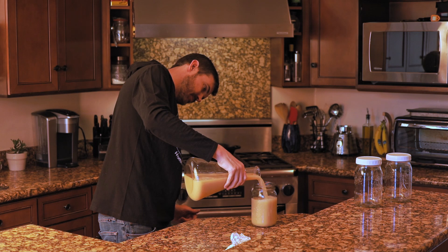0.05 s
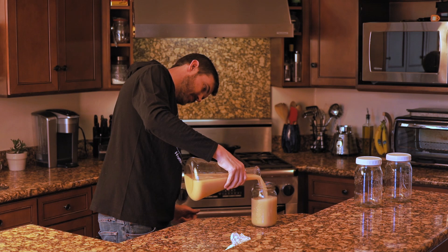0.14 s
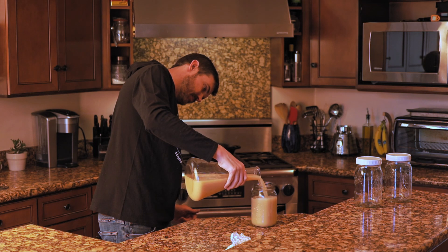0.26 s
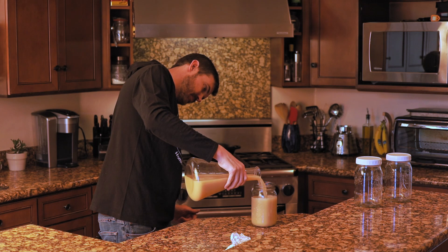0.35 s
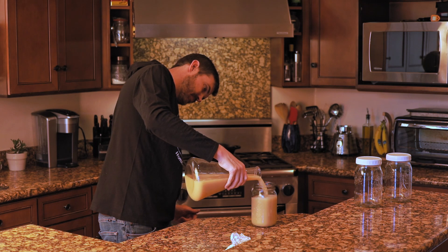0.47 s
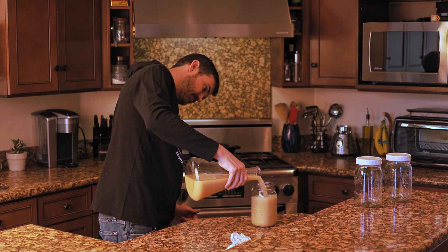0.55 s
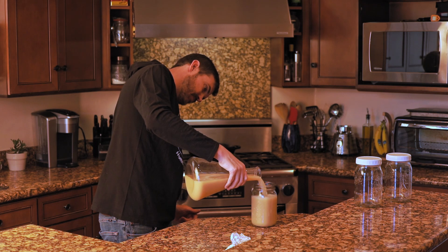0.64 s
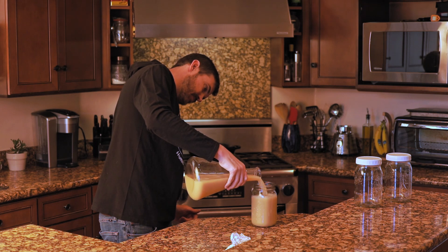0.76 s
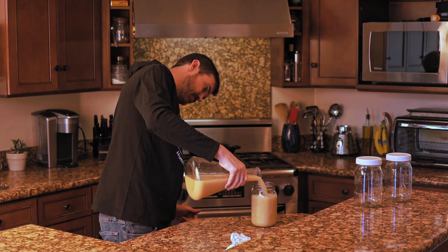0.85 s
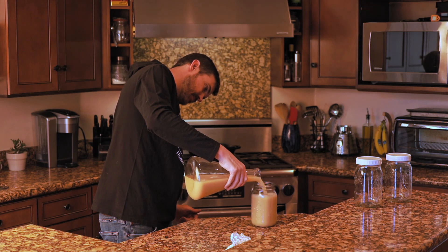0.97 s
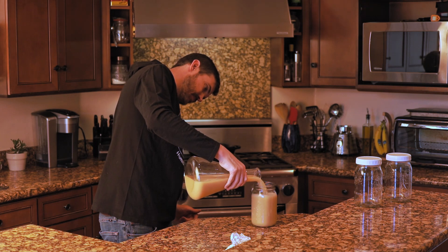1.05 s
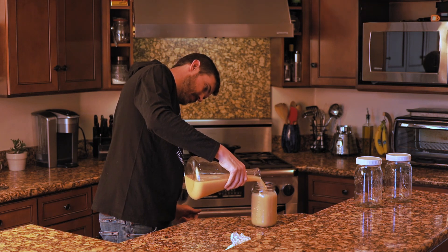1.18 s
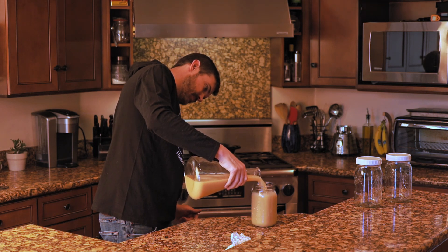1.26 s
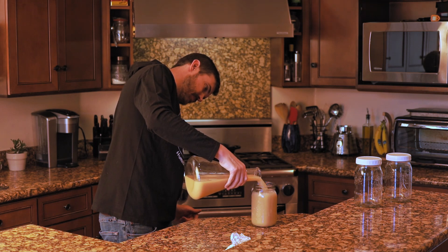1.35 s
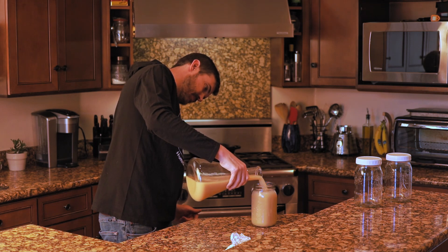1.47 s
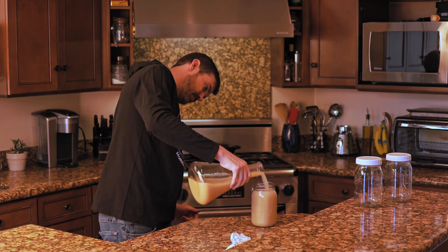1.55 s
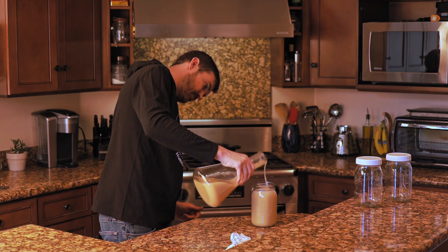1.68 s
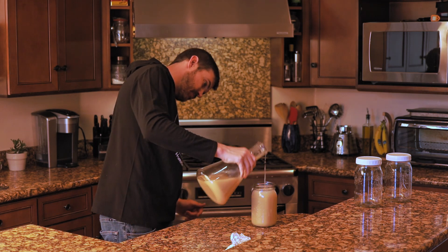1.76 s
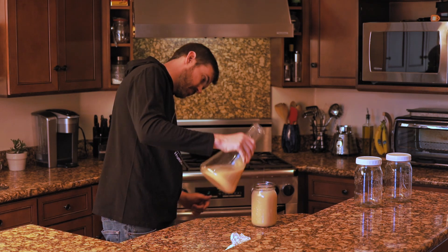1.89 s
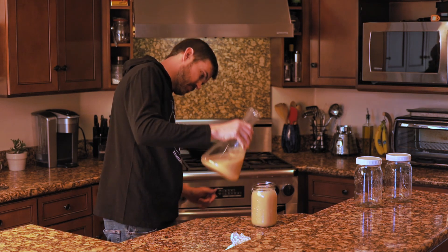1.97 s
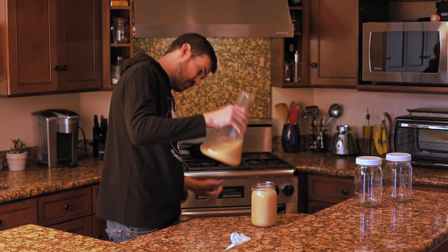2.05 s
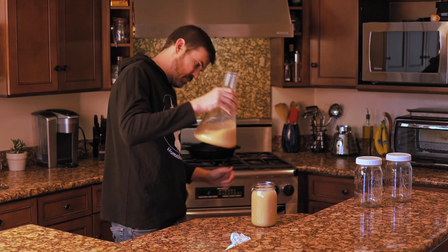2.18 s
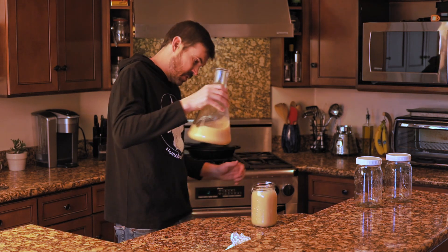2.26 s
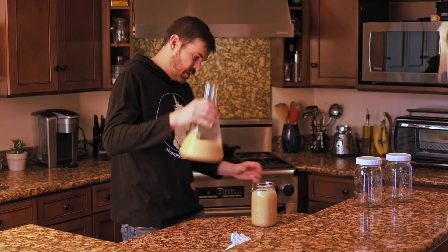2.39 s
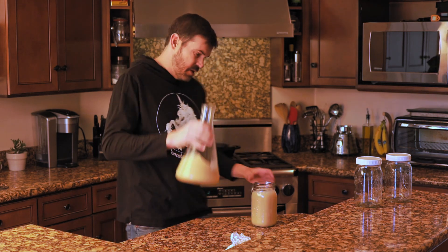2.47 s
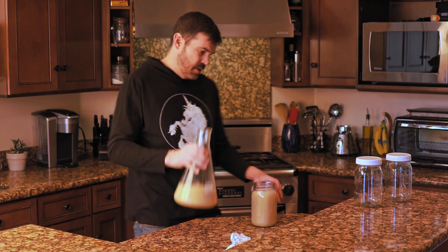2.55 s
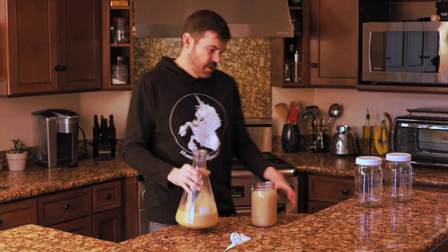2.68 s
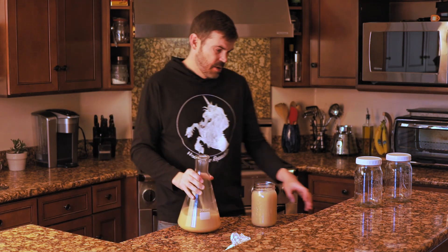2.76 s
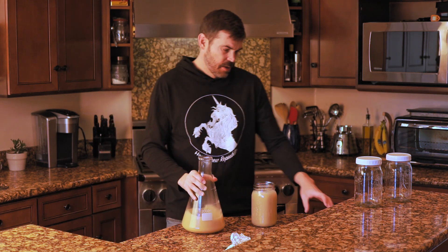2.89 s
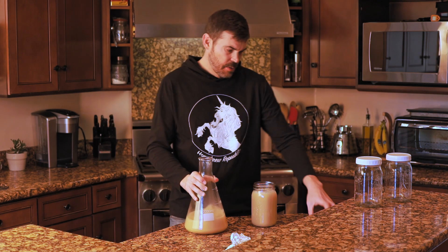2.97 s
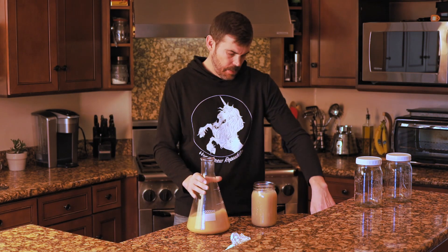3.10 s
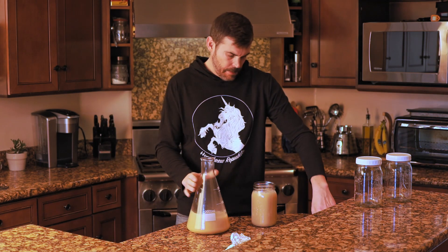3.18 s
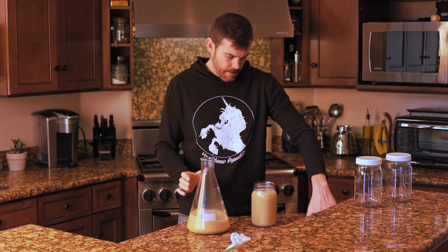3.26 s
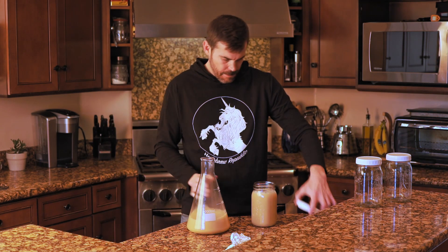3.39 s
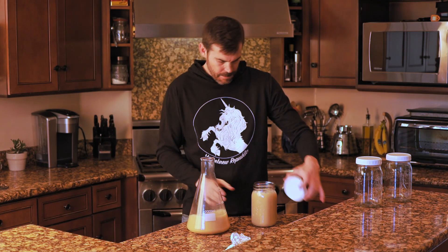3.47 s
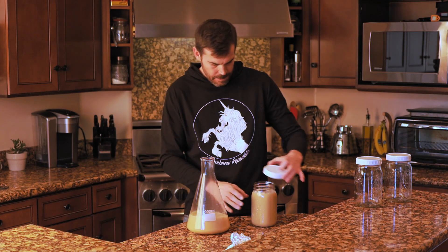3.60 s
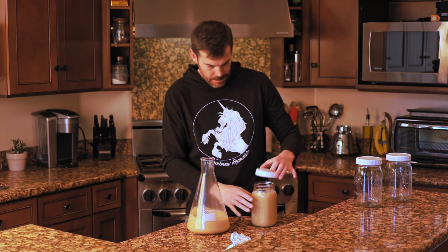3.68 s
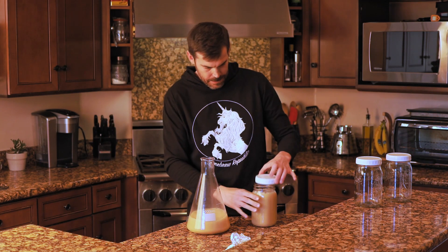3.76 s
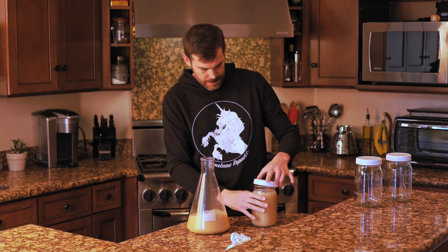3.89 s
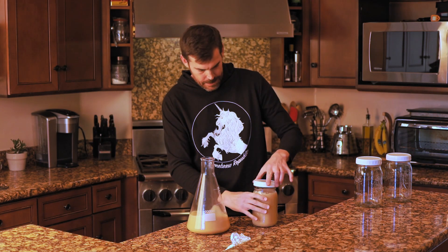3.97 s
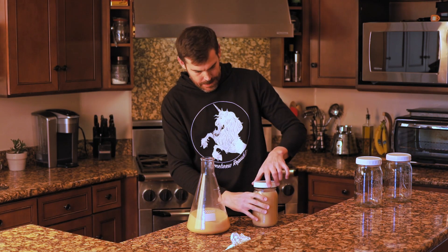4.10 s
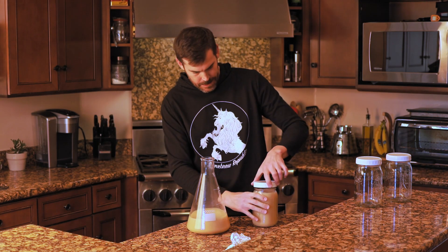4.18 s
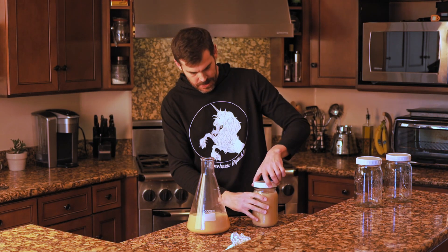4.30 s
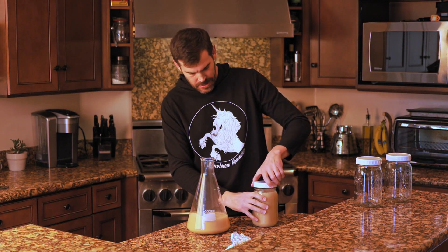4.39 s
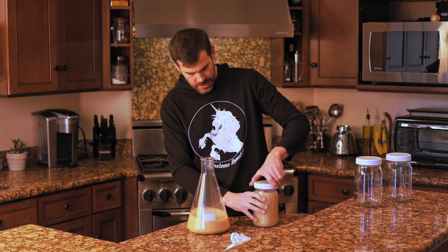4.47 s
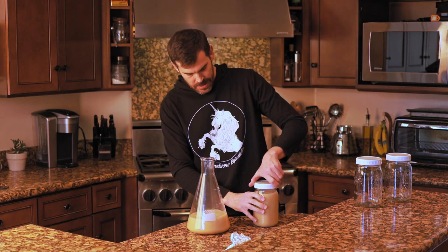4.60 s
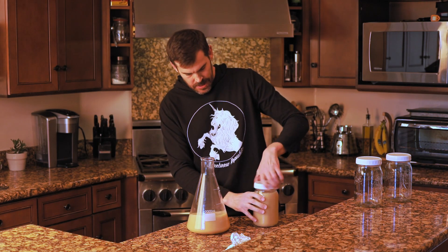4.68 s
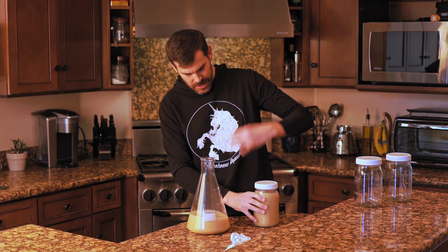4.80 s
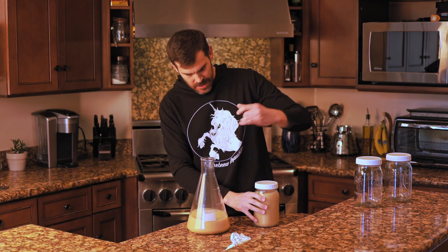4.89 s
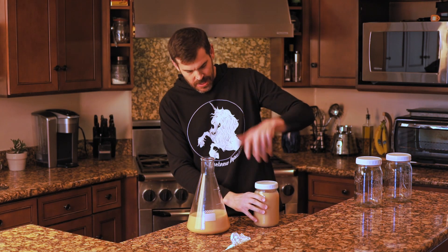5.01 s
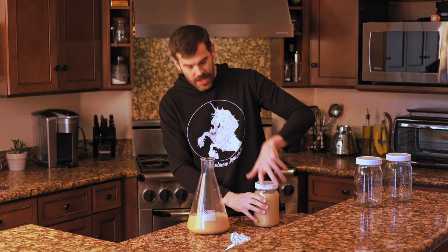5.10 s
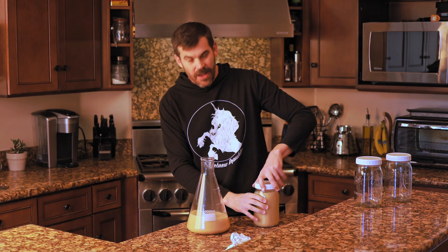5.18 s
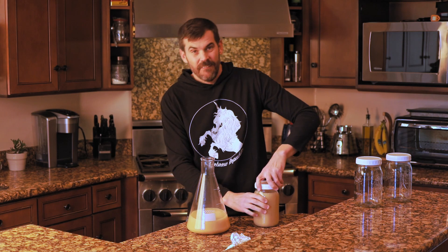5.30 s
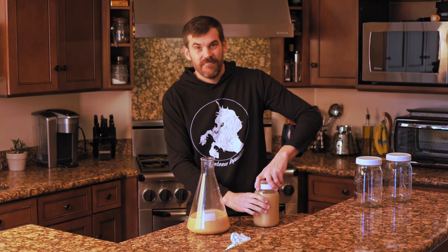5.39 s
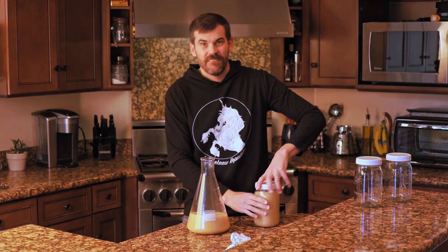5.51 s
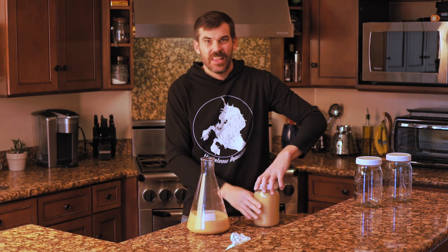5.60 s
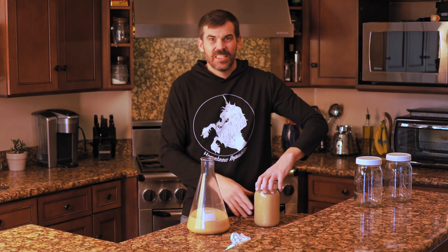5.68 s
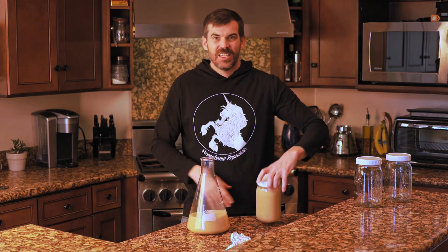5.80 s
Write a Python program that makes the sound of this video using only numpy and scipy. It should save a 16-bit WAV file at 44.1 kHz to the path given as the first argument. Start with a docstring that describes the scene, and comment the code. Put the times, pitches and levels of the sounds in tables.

```python
"""We hear a thick drink gurgle from a glass flask into a jar: the note of the air above it mostly climbs, then sinks.
The drink slaps back down the neck; the flask is set on a stone counter, edge first, then flat, and rings.
A plastic lid drops on the jar, rocks, is pressed down, turned and seated, all in a hard-walled kitchen.
Solid things and enclosed air are mostly fading tones; splashes, rubs, cloth and echoes are shaped noise or tiny grains."""
import sys
import numpy as np
from scipy import signal
from scipy.fft import rfft, irfft, next_fast_len
from scipy.io import wavfile

SR = 44100
rng = np.random.default_rng(int(sys.argv[2]) if len(sys.argv) > 2 else 0)


def master(y):
    """Save y as 16-bit WAV."""
    cut = np.clip(np.atleast_2d(y).T, -1, 1)
    pcm = np.round(cut * 32767)  # scale
    wavfile.write(sys.argv[1], SR, pcm.astype(np.int16))


N = 257984   # length of the scene in samples
TIME = np.arange(N) / SR
AGE = TIME[:SR]   # the second that follows a blow
STREAM_END_S = 1.83

# Note of the air in the jar above the liquid: (time [s], pitch [Hz])
AIR_COLUMN = [(0, 848), (.25, 905), (.48, 956), (.64, 1058), (1.19, 1042), (1.38, 1145), (1.65, 980),
              (1.9, 970)]
# Force of the stream, before each layer's trim: (time [s], level deep in the jar [dB], level at the surface [dB])
FLOW = [(0, -49, -46.5), (.15, -50.5, -53.5), (.32, -49, -49.5), (.53, -57, -57.5), (.72, -54, -56),
        (.95, -63.5, -58.5), (1.2, -56.5, -59.5), (1.45, -53.5, -56.5), (1.7, -56, -61), (1.83, -69, -52)]


def from_db(db):
    """Turn decibels into a gain."""
    return 10 ** (np.asarray(db) / 20)


def rms_one(x):
    """Scale to an rms (average strength) of one."""
    return x / np.sqrt(np.mean(x ** 2) + 1e-20)


def at_level(x, db):
    """Give a short sound the energy of 10 ms at this rms level."""
    return from_db(db) * x / np.sqrt(np.sum(x ** 2) / (SR / 100) + 1e-20)


def in_time(rows):
    """Draw each column of a timed table as a curve with a value at every sample."""
    seconds, *columns = np.transpose(rows)
    return [np.interp(TIME, seconds, column) for column in columns]


def at_hz(points, hz):
    """Read a spectrum between its points, on a log-frequency axis."""
    point_hz, point_db = np.array(points)[:, 0], np.array(points)[:, 1]
    return np.interp(np.log(hz), np.log(point_hz), point_db)


def add(track, s, sound):
    """Mix a sound in at time s, in seconds."""
    start = max(0, round(s * SR))
    track[start:start + len(sound)] += sound[:N - start]


def butter(x, hz, kind, order=2):
    """Filter forward in time with a smooth (Butterworth) response."""
    sos = signal.butter(order, np.clip(hz, 10, .45 * SR), kind, fs=SR, output="sos")
    return signal.sosfilt(sos, x + 1e-18)


def bands(size):
    """Half-octave bands of noise as (centre Hz, samples); neighbours are unrelated."""
    edges = 22 * 2 ** np.arange(0, 10, .5)
    white = rng.standard_normal((2, size + SR // 4))   # the extra start lets the filters settle
    out = []
    for k, (low, high) in enumerate(zip(edges, edges[1:])):
        out.append((np.sqrt(low * high), butter(white[k % 2], [low, high], "band")[-size:]))
    return out


def drift(rate):
    """A slow random wander of rms one, with this many new values a second."""
    knots = rng.standard_normal(4096)
    return rms_one(np.interp(TIME * rate, np.arange(len(knots)), knots))


def hiss(spectrum):
    """Steady noise coloured by a spectrum."""
    size = next_fast_len(N)
    hz = np.maximum(np.arange(size // 2 + 1) * SR / size, 1)
    white = rfft(rng.standard_normal(size))
    return rms_one(irfft(white * from_db(at_hz(spectrum, hz)), size)[:N])


def clicks(per_s, spread_db):
    """Single-sample clicks at random times; a wider spread makes their sizes less even."""
    out = np.zeros(N)
    at = np.flatnonzero(rng.random(N) < per_s / SR)
    sizes = from_db(spread_db * np.minimum(rng.exponential(1, N)[at], 4))
    out[at] = sizes * rng.choice([-1, 1], N)[at]
    return out


def mode(hz, t60):
    """One ringing tone, a sine that fades by 60 dB in t60 seconds."""
    out = np.zeros(len(AGE))
    age = AGE[:int(2 * max(t60, .001) * SR)]
    out[:len(age)] = np.sin(2 * np.pi * hz * age) * np.exp(-np.log(1000) * age / max(t60, .0002))
    return out


def burst(length):
    """Noise of a contact, falling 30 dB in its length in seconds."""
    return rng.standard_normal(SR // 5) * from_db(-30 * AGE[:SR // 5] / max(length, .0005))


def spatter(hz, octaves, length):
    """A brief wet burst of noise round one pitch."""
    edges = hz * 2 ** (np.array([-.5, .5]) * max(octaves, .02))
    noise = butter(burst(length), edges, "band", order=1)
    return butter(noise, hz / 2, "high")


def grains(spectrum, per_s, spread_db, cycles, count=24):
    """Tiny bubbles or slips, each ringing a few cycles at one of a set of pitches."""
    train, out = clicks(per_s, spread_db), np.zeros(N)
    pitch_number = rng.integers(0, count, N)
    at = np.flatnonzero(train)
    for k, hz in enumerate(np.geomspace(spectrum[0][0], min(spectrum[-1][0], SR / 3), count)):
        own = at[pitch_number[at] == k]
        ring = mode(hz, cycles / hz)[:int(cycles / hz * SR) + 2]
        gain = from_db(at_hz(spectrum, hz)) * hz   # high grains are shorter and wider
        places = own[:, None] + np.arange(len(ring))
        values = np.outer(train[own], gain * ring)
        out += np.bincount(places.ravel(), values.ravel(), N)[:N]
    return rms_one(butter(out, spectrum[0][0], "high"))


def swelling_notes(rows, swell_s):
    """Each note is a sine that swells briefly and rings out."""
    out = np.zeros(N)
    for s, hz, db, t60 in rows:
        add(out, s, at_level(mode(hz, t60) * (1 - np.exp(-AGE / swell_s)), db))
    return out


def still_room():
    """The quiet room is a steady low noise."""
    # Colour of the still room: (frequency [Hz], relative level [dB per Hz])
    room_noise = [(25, -12), (50, -7), (130, 3), (250, -3), (500, -6.5), (900, -12), (1500, -20.5),
                  (3000, -20), (6000, -19.5), (12000, -23), (16000, -30)]
    return from_db(-68) * hiss(room_noise)


def kitchen(x, build_s):
    """Dense reflections from stone and cabinets build up quickly and die sooner in the treble."""
    # Time the echoes take to fade by 60 dB: (frequency [Hz], fading time [s])
    fading_times = [(60, 0.34), (200, 0.44), (560, 0.51), (1500, 0.48), (4000, 0.46), (10000, 0.29),
                    (16000, 0.13)]
    # Colour of the echoes: (frequency [Hz], relative level [dB])
    echo_colour = [(50, 3.5), (200, -1), (1000, -1), (4000, 0.5), (8000, -4), (15000, -10.5)]
    tail = np.zeros(SR)
    for hz, noise in bands(SR):
        tail += noise * from_db(at_hz(echo_colour, hz) - 60 * AGE / at_hz(fading_times, hz))
    tail = tail * (1 - np.exp(-(AGE / build_s) ** 2))
    midrange_gain = np.sqrt(np.mean(np.abs(rfft(tail)[200:4000]) ** 2))   # one bin per Hz
    return signal.fftconvolve(x, tail / midrange_gain)[:N]


def sleeves():
    """Cloth brushes, its noise swelling and fading with each movement of an arm."""
    # Arm movements: (middle [s], half length [s], level [dB])
    brushes = [(2.643, 0.35, -65), (2.921, 0.033, -62), (3.624, 0.14, -66), (3.881, .04, -65.5),
               (5.279, 0.054, -75), (5.631, .12, -72)]
    # Colour of the cloth: (frequency [Hz], relative level [dB per Hz])
    cloth_colour = [(200, -6.5), (1000, -2), (3000, 0), (7000, -8.5), (15000, -17)]
    swells = sum(from_db(db) * np.exp(-((TIME - s) / half) ** 2) for s, half, db in brushes)
    return hiss(cloth_colour) * swells


def thud(under_jar, dense_db):
    """The counter answers a blow with its main tones over a dull rush of crowded ones."""
    # Tones of the counter and the cabinet below:
    # (pitch [Hz], relative level under the flask [dB], the same under the jar [dB], t60 [s])
    counter_modes = [(53, -27, -35.5, 0.98), (102, -12, -10, 0.22), (136, -9.5, -3, .08),
                     (186.6, -7, -12.5, 0.28), (221, -2, -1.5, 0.084), (296, -8.5, -1.5, 0.23),
                     (396, -6.5, 5.5, 0.064), (483.6, 2.5, 8, 0.072), (521, -5, -9.5, 0.05),
                     (601.6, 1, -9.5, 0.021), (653, 4, 5.5, 0.047), (809, 1, 2, 0.06),
                     (896, 2.5, -12.5, 0.071), (1038, 1, 4.5, 0.042), (1122, -2, -8.5, 0.07)]
    tones = np.zeros(len(AGE))
    for k, (hz, flask_db, jar_db, t60) in enumerate(counter_modes):
        tones += (-1) ** k * from_db(jar_db if under_jar else flask_db) * mode(hz, t60)
    out = at_level(tones, 0)
    add(out, 0, at_level(butter(burst(length=0.013), [170, 1000], "band"), dense_db))
    return out


def thread():
    """The turning lid sticks and slips on the glass thread, and the jar groans along."""
    # Turns of the lid: (start [s], length [s], final rasp level [dB], final groan level [dB])
    turns = [(4.387, 0.21, -60, -52.5), (4.787, 0.08, -33, -49), (5.505, 0.081, -66.5, -62.5)]
    # Colour of the rasp: (frequency [Hz], relative level [dB per Hz])
    rasp_colour = [(150, -13), (700, -1), (1800, 0.5), (3000, -3), (5000, 0), (9000, -12), (15000, -17)]
    # Colour of the groan: (frequency [Hz], relative level [dB per Hz])
    groan_colour = [(80, -20), (200, -7), (500, -3.5), (850, 3.5), (1200, -7), (2500, -30.5)]
    tighten_db_per_s, attack_s, release_s = 152, 0.026, 0.0072
    rasp = grains(rasp_colour, per_s=3800, spread_db=0.0, cycles=1.1)
    groan = hiss(groan_colour)
    out = np.zeros(N)
    for s, length, rasp_db, groan_db in turns:
        left = s + length - TIME   # seconds until the turn ends
        grip = np.clip((TIME - s) / attack_s, 0, 1) ** 2 * np.exp(np.minimum(left, 0) / release_s)
        tightening = from_db(-tighten_db_per_s * np.maximum(left, 0))   # louder as the thread tightens
        out += grip * tightening * (from_db(rasp_db) * rasp + from_db(groan_db) * groan)
    return out


def lid_and_counter_notes():
    """Short low notes of the lid rocking and of the counter under its knocks, each with a t60 of 19 cycles."""
    # Notes of the lid and the counter: (time [s], pitch [Hz], level [dB])
    short_notes = [(4.01, 410, -35.5), (4.029, 361, -43.5), (4.096, 320, -46.5), (4.168, 322, -48.5),
                   (4.191, 256, -51), (4.585, 251, -30.5), (4.602, 702, -25.5), (4.849, 438, -29.5),
                   (4.867, 511, -29.5), (5.123, 1434, -59.5), (5.338, 883, -57), (5.709, 456, -32)]
    return swelling_notes([(s, hz, db, 19 / hz) for s, hz, db in short_notes], swell_s=0.0035)


def lid():
    """The lid clacks and ticks on glass and pushes the jar on the counter: (direct, sent to the room)."""
    # Lid against jar; the harder the contact, the higher and louder its tick:
    # (time [s], clack level [dB], thud level [dB], tick pitch [Hz])
    touches = [(3.8985, -21.5, -40.5, 1300), (3.911, -42, -54, 2785), (3.9191, -34, -52, 3700),
               (3.9499, -31.5, -37, 4670), (4.011, -48, -50, 4490), (4.029, -44, -44.5, 4255),
               (4.062, -46.5, -44.5, 4500), (4.096, -42.5, -49, 3660), (4.192, -48.5, -55.5, 2100),
               (4.395, -75, -62.5, 2000), (4.5786, -43.5, -30.5, 2480), (4.582, -24.5, -26.5, 10140),
               (4.5855, -30, -27, 8700), (4.5908, -25, -27.5, 8500), (4.847, -44, -36, 6030),
               (4.862, -38, -40, 5000), (4.867, -28, -31.5, 2010), (5.123, -70, -74, 3520),
               (5.338, -74, -55.5, 1980), (5.6826, -46.5, -59, 2200), (5.7095, -54, -31.5, 4400)]
    # Tones of the plastic lid: (pitch [Hz], relative level [dB], t60 [s])
    lid_modes = [(1035, 0, 0.024), (1344, 1.5, 0.0091), (1775, -3.5, 0.04), (2130, -2, 0.0072),
                 (2523, -1, 0.015), (3030, -6.5, 0.011), (4260, -15.5, .008)]
    # The tick's level relative to the clack
    tick_db, tick_db_per_octave, tick_reference_hz = -6.5, 4.5, 4400
    clack_room_db, thud_room_db, tick_room_db = -5.5, 0, 0
    direct, sent = np.zeros(N), np.zeros(N)
    rings = np.array([(-1) ** k * from_db(db) * mode(hz, t60) for k, (hz, db, t60) in enumerate(lid_modes)])
    for s, clack_db, thud_db, tick_hz in touches:
        weights = from_db(rng.normal(0, 1.4, len(lid_modes)))   # each touch weights the tones anew
        clack = at_level(weights @ rings, clack_db)
        tick = butter(burst(length=0.0082), [tick_hz / 1.9, tick_hz * 1.32], "band", order=1)
        tick = butter(tick, 14000, "low")
        octaves_up = np.log2(tick_hz / tick_reference_hz)
        tick = at_level(tick, clack_db + tick_db + tick_db_per_octave * octaves_up)
        push = at_level(thud(under_jar=True, dense_db=-0.5), thud_db)
        for part, room_db in (clack, clack_room_db), (push, thud_room_db), (tick, tick_room_db):
            add(direct, s, part)
            add(sent, s, part * from_db(room_db))
    return direct, sent


def wall_mode(hz, t60):
    """A struck tone of the glass, its pitch wavering as the drink sloshes inside."""
    slosh_share, slosh_per_s = .008, 70   # typical size as a share of the pitch, new values a second
    waver = np.interp(AGE * slosh_per_s, np.arange(256), rng.standard_normal(256))
    phase = 2 * np.pi * hz * np.cumsum(1 + slosh_share * waver) / SR
    return np.sin(phase) * np.exp(-np.log(1000) * AGE / t60)


def flask():
    """Glass meets stone: returns (ring of the wall, gritty crack and thud of the counter)."""
    # Flask on the counter, before the trims below and in the mix: (time [s], ring level [dB], thud level [dB],
    # crack level [dB], crack top [Hz], flatness of the landing [0-1])
    landings = [(2.9288, -11.5, -11.5, -16.5, 5967, 0.43), (3.03, -30, -26, -42.5, 3086, 0.3),
                (3.109, -18, -13.5, -20, 2200, 0.84), (3.1167, -22.5, -18.5, -25, 2486, 1),
                (3.156, -24, -19, -22.5, 4060, 1)]
    # Tones of the flask's wall:
    # (pitch [Hz], relative level struck on the edge [dB], the same set down flat [dB], t60 [s])
    glass_modes = [(1633, -2.5, -11, 0.45), (1678, -4, -9, 0.38), (1716, -10, -6, 0.36),
                   (1824, -8, -2, 0.11), (2425, -20, -5.5, 0.089), (2414, -15.5, -6.5, 0.054),
                   (3122, -2.5, -4, .19), (3228, -7.5, -1.5, 0.29), (3366, -8.5, -3, 0.12),
                   (3506, -2.5, -3, 0.16), (3680, 1.5, -7, 0.26), (3670, -6.5, -3.5, .09),
                   (3860, -4.5, -5, 0.067), (3927, -16, -1, 0.32), (4060, -12, -6.5, .12),
                   (4180, -17, -6, 0.083), (5040, -13, -10, 0.034), (5370, -3, -13, 0.29),
                   (5294, -4, -11, 0.12), (5450, -7, -11.5, 0.058), (6160, -18, -17.5, 0.25),
                   (7000, -17, -19, 0.078), (7960, -15.5, -24, 0.15), (8060, -11, -19.5, 0.24),
                   (9087, -22, -28.5, 0.14), (10250, -23.5, -27, 0.21)]
    ring, blow = np.zeros(N), np.zeros(N)
    tones = [wall_mode(hz, t60) for hz, edge_db, flat_db, t60 in glass_modes]
    for s, ring_db, thud_db, crack_db, top_hz, flat in landings:
        wall = np.zeros(len(AGE))
        for k, (hz, edge_db, flat_db, t60) in enumerate(glass_modes):
            # the place of contact decides which tones are driven
            wall += (-1) ** k * from_db(np.interp(flat, [0, 1], [edge_db, flat_db])) * tones[k]
        crack = butter(butter(burst(length=0.039), top_hz, "low", order=1), 10000, "low")
        first_touch = butter(butter(burst(length=0.0028), top_hz, "low", order=1), 10500, "low")
        add(ring, s, at_level(wall, ring_db))
        add(blow, s, at_level(thud(under_jar=False, dense_db=-5.0), thud_db))
        add(blow, s, at_level(crack, crack_db - 2.5))
        add(blow, s, at_level(first_touch, crack_db - 3.5))
    return ring, blow


def backwash(count):
    """The flask is righted: ever larger, louder bubbles run along its neck, the drink slaps back, the neck rings."""
    # Air in the flask's neck: (pitch [Hz], relative level [dB], t60 [s])
    neck_modes = [(985, -16.5, 0.13), (1880, 1, 0.044), (2076, -2, 0.069), (2936, 3.5, 0.037),
                  (3110, -2, 0.05), (3370, -6, 0.069)]
    ebb_start_s, ebb_s, ebb_start_hz, ebb_end_hz = 1.514, .105, 2870, 1420
    ebb_db, ebb_growth_db = -56.5, 8
    slap_s, slap_db = 1.934, -35.5
    out = np.zeros(N)
    for part in np.linspace(0, 1, count):
        hz = ebb_start_hz + (ebb_end_hz - ebb_start_hz) * part
        bubble = at_level(spatter(hz, octaves=0.13, length=.05), ebb_db + ebb_growth_db * part)
        add(out, ebb_start_s + ebb_s * np.sqrt(part), bubble)
    neck = sum((-1) ** k * from_db(db) * mode(hz, t60) for k, (hz, db, t60) in enumerate(neck_modes))
    swell = 1 - np.exp(-AGE / 0.0055)
    add(out, slap_s, at_level(neck * swell, slap_db))
    slap = spatter(hz=2160, octaves=0.93, length=.12)
    spray = spatter(hz=5500, octaves=.66, length=0.2)
    add(out, slap_s, at_level(slap * swell[:len(slap)], db=-40))
    add(out, slap_s, at_level(spray * swell[:len(spray)], db=-48))
    return out


def drops():
    """Each drop or bursting film is a brief spatter round one pitch; thick clots thump lower and longer."""
    # Films bursting and drops landing: (time [s], pitch [Hz], level [dB], width [octaves])
    landing_drops = [(.031, 8060, -39, 0.3), (0.077, 7840, -39, 0.082), (0.177, 6000, -50, 1.2),
                     (0.2962, 6150, -34.5, 0.18), (.307, 6740, -43, 0.15), (.318, 6650, -45.5, 0.11),
                     (.386, 5200, -47.5, .7), (.614, 8550, -43, 0.13), (.832, 7000, -48.5, 2.6),
                     (1.23, 3300, -54, .15), (1.788, 4400, -49.5, 1.4), (1.841, 7950, -44.5, .8),
                     (1.853, 9050, -38.5, 1.1), (1.855, 2370, -43, 0.68), (1.902, 4520, -57, 3),
                     (2.478, 4260, -60, 1.8), (2.57, 3130, -56.5, 0.39), (2.633, 7100, -57, 1.1),
                     (2.724, 7940, -55.5, .3)]
    # Thick clots plopping in: (time [s], level [dB])
    plops = [(.297, -54), (.831, -46.5), (2.569, -60.5)]
    out = np.zeros(N)
    for s, hz, db, octaves in landing_drops:
        add(out, s, at_level(spatter(hz, octaves, length=.004), db))
    for s, db in plops:
        thump = butter(spatter(hz=330, octaves=4.4, length=.05), 1240, "low")
        add(out, s, at_level(thump, db))
    return out


def gulps():
    """Air pockets swallowed by the stream ring at the air column's pitch; drips ring at their own."""
    # Gulped air pockets: (time [s], level [dB])
    air_pockets = [(.001, -32), (.031, -38), (.0765, -37), (.112, -42.5), (.255, -44.5), (.2965, -35.5),
                   (.323, -43), (.481, -44.5), (.615, -45), (.642, -41.5), (.831, -36.5), (1.057, -52),
                   (1.184, -42), (1.197, -40), (1.519, -49), (1.604, -51), (1.8822, -45)]
    # Drips that ring clear: (time [s], pitch [Hz], level [dB])
    clear_drips = [(0.95, 5500, -57.5), (1.372, 2394, -52.5), (1.373, 4270, -55), (2.059, 2360, -53.5),
                   (2.088, 2390, -55), (2.569, 1400, -56.5), (2.721, 7900, -53.5)]
    pocket_t60_s, drip_t60_s = 0.026, 0.12
    pockets = [(s, np.interp(s, *np.transpose(AIR_COLUMN)), db, pocket_t60_s) for s, db in air_pockets]
    drips = [(s, hz, db, drip_t60_s) for s, hz, db in clear_drips]
    return swelling_notes(pockets + drips, swell_s=0.00069)


def blips(per_s, low_hz, high_hz, cycles, rise, level_db):
    """Single bubbles glide upward as they near the surface, louder when the stream splashes more."""
    out, flow_db = np.zeros(N), in_time(FLOW)[1]
    for when, size, strength in rng.random((int(per_s * STREAM_END_S), 3)):
        s = when * STREAM_END_S
        hz = low_hz * (high_hz / low_hz) ** size
        life = AGE[:SR // 10] * hz / cycles   # 1 when the bubble has faded by 60 dB
        bubble = np.sin(2 * np.pi * cycles * life * (1 + rise * life)) * np.exp(-np.log(1000) * life)
        add(out, s, at_level(bubble, flow_db[int(s * SR)] + level_db + 8 * strength ** 2))
    return out


def air_column(drive, width_hz):
    """The jar's gliding air resonance; two poles in a row keep its skirts steep."""
    turn = np.exp(2j * np.pi * np.cumsum(in_time(AIR_COLUMN)[0]) / SR)
    r = np.exp(-np.pi * width_hz / SR)
    # shift the gliding pitch down to zero, filter there, then shift back up
    filtered = signal.lfilter([1], [1, -2 * r, r * r], drive / turn)
    return rms_one((filtered * turn).real)


def stream():
    """The falling liquid drums on the surface, stirs the air column and whips up fine bubbles."""
    # Colour of the splash: (frequency [Hz], relative level [dB per Hz])
    splash_colour = [(600, -7), (1200, -15), (1800, 5), (2900, 10), (4200, -1), (5500, 1), (9000, -31)]
    # Colour of the fizz: (frequency [Hz], relative level [dB per Hz])
    fizz_colour = [(3000, -4), (5000, -5.5), (7000, -2.5), (10000, -9.5), (15000, -11)]
    # Colour of the low drumming: (frequency [Hz], relative level [dB per Hz])
    drumming_colour = [(30, 7.5), (70, -9), (120, 4.5), (200, 1), (320, -4), (600, -9.5), (1000, -28)]
    gurgle_db, splash_db, fizz_db = -2, -3.5, -6   # gurgle relative to the deep level, others to the surface
    drumming_db, release_s = -61, 0.082   # the drumming is steady while the stream runs
    deep_db, surface_db = in_time(FLOW)
    stirring = clicks(per_s=320, spread_db=3.5)
    gurgle = from_db(deep_db + gurgle_db) * air_column(stirring, width_hz=310)
    surge = from_db(surface_db + 1.05 * drift(rate=30))   # the stream ebbs and swells
    splash = from_db(splash_db) * grains(splash_colour, per_s=1800, spread_db=3.0, cycles=39)
    fizz = from_db(fizz_db) * grains(fizz_colour, per_s=3900, spread_db=4.5, cycles=8.9)
    drumming = from_db(drumming_db) * hiss(drumming_colour)
    flowing = np.clip(1 - (TIME - STREAM_END_S) / release_s, 0, 1)
    return flowing * (gurgle + surge * (splash + fizz) + drumming)


def scene():
    """Mix pouring, flask and lid, each with its share of the room, over the quiet background."""
    background = still_room() + sleeves()
    knocks, knocks_sent = lid()
    low_notes = lid_and_counter_notes()
    rub = thread()
    ring, blow = flask()
    bubbles = blips(per_s=40, low_hz=952, high_hz=5500, cycles=91, rise=0.16, level_db=-8.5)
    liquid = stream() + bubbles + gulps() + drops() + backwash(count=6)
    direct = liquid + from_db(0.64) * ring + blow + knocks + low_notes + rub
    sent = from_db(-5.5) * (liquid + low_notes) + knocks_sent
    sent += from_db(-3.0) * ring + from_db(-1.86) * blow + from_db(-3.0) * rub
    return (direct + kitchen(sent, build_s=0.0011) + background)[None]


def record(dry):
    """The microphone drops the deepest bass, peaks beyond full scale are clipped and the top is cut."""
    heard = np.clip(butter(dry, 49, "high", order=4), -1, 1)
    top_cut = signal.ellip(10, .1, 80, 16200, fs=SR, output="sos")   # steep cut above 16200 Hz
    return signal.sosfilt(top_cut, heard)


dry = scene()
out = record(dry)
master(out)
```